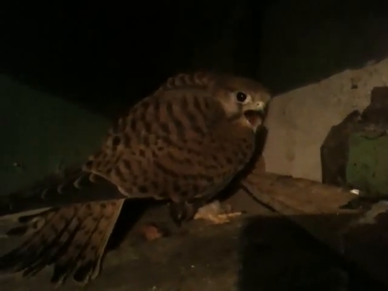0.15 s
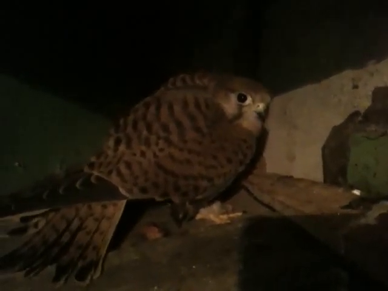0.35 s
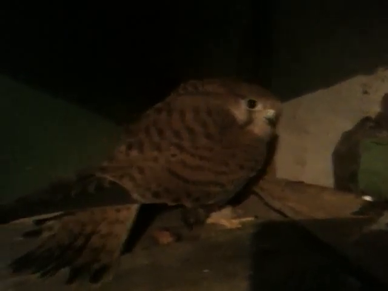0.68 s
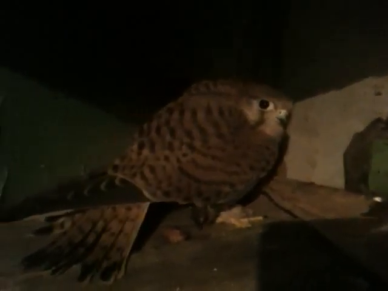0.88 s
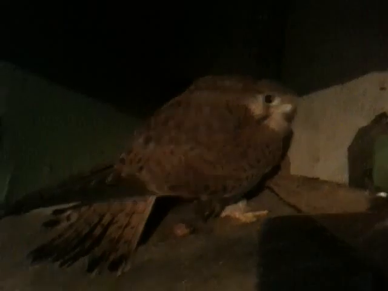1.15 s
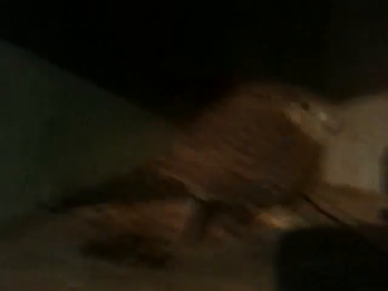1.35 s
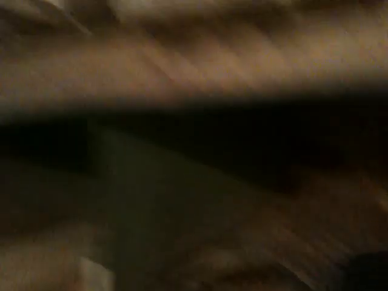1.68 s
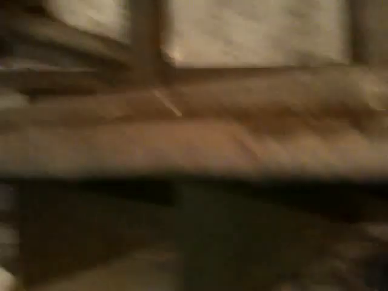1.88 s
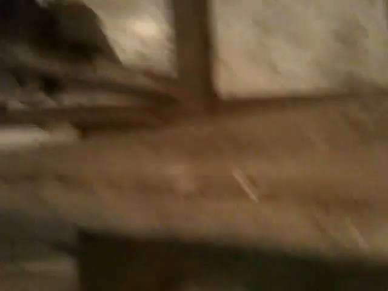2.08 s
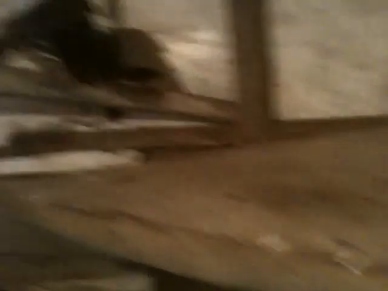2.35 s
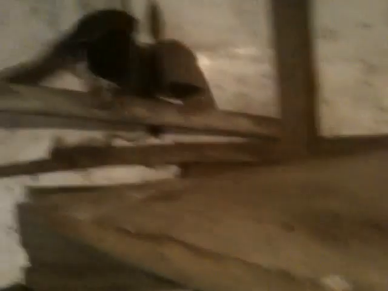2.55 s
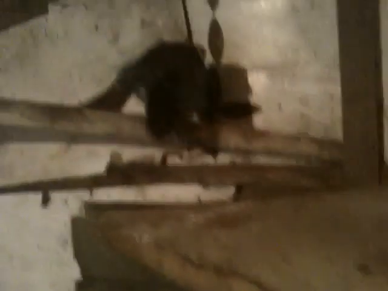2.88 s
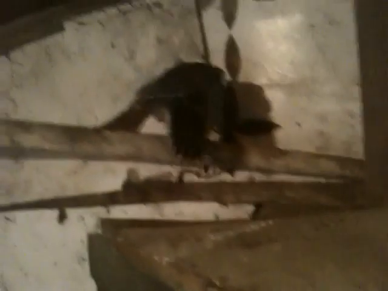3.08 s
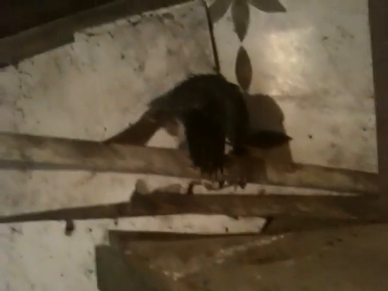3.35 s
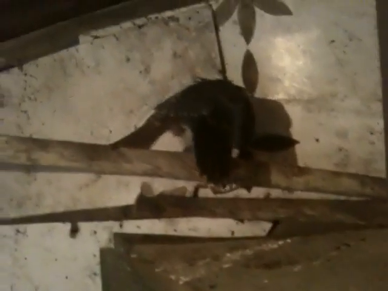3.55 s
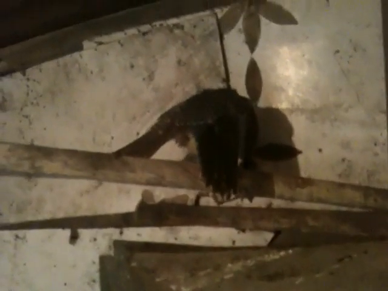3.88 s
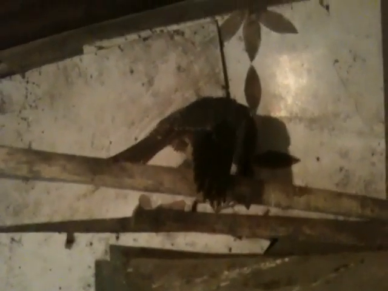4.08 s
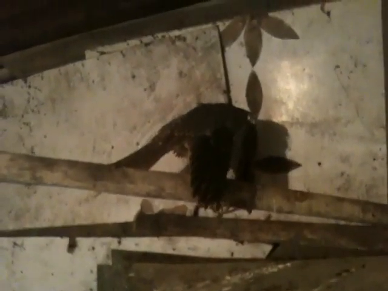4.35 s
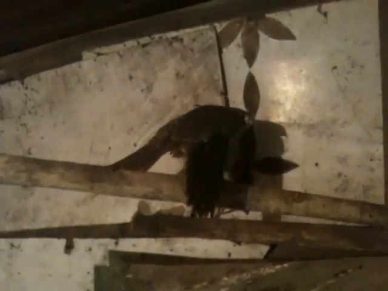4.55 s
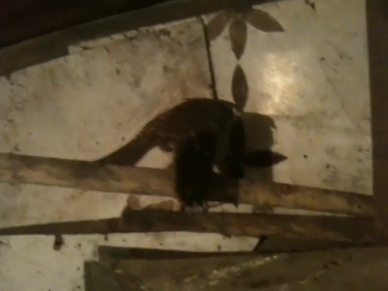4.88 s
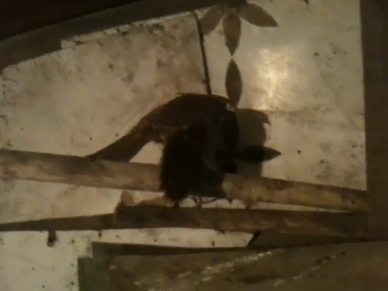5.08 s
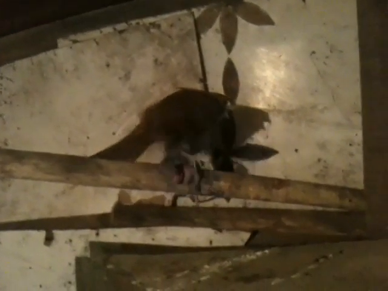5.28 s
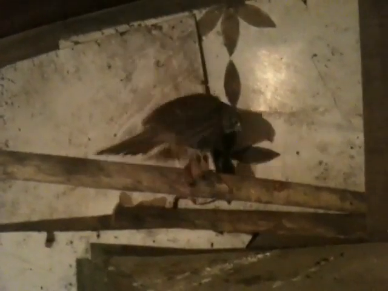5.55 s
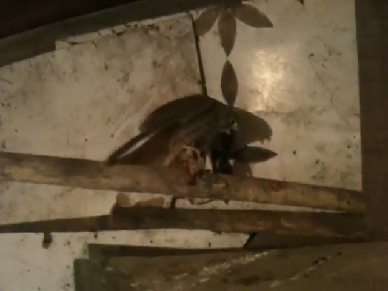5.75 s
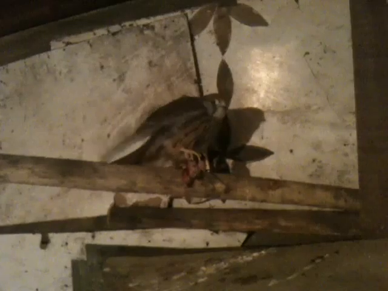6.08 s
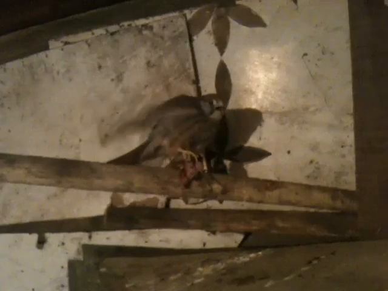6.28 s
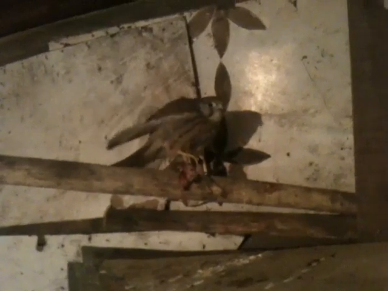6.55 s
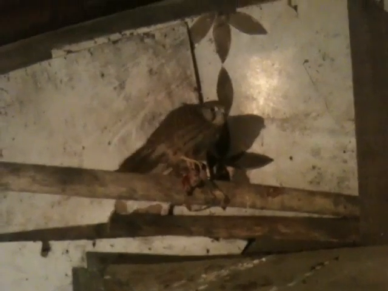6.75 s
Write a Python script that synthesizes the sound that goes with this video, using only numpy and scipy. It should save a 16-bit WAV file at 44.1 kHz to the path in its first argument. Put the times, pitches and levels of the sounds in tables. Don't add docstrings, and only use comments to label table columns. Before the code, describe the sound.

Piercing, fast-trembling kestrel screams, first crowded and overlapping, then spaced apart, ring off boards in a small attic with background hiss.

```python
import sys
import numpy as np
from scipy import signal
from scipy.io import wavfile
from scipy.ndimage import uniform_filter1d, minimum_filter1d

SR = 44100
rng = np.random.default_rng(int(sys.argv[2]) if len(sys.argv) > 2 else 0)


def field_ratio(decibels):
    return 10 ** (np.asarray(decibels, dtype=float) / 20)


def persist_wave(psi):
    counts = np.round(np.clip(psi, -1, 1) * 32767).astype(np.int16)
    wavfile.write(sys.argv[1], SR, np.atleast_2d(counts).T)


N = 304819

# (start [s], opening crest [s], first trill crest [s], last trill crest [s], end [s])
SCREAM_TIMES = [(0.0, .012, .064, .266, .308), (.31, .354, .406, .532, .568),
                (.675, .706, .776, 1.043, 1.078), (1.18, 1.204, 1.285, 1.543, 1.58),
                (1.69, 1.712, 1.794, 2.057, 2.092), (1.845, 1.86, 1.955, 2.213, 2.243),
                (2.258, 2.312, 2.377, 2.505, 2.562), (2.49, 2.512, 2.585, 2.845, 2.862),
                (2.678, 2.698, 2.772, 3.031, 3.066), (3.195, 3.207, 3.304, 3.495, 3.542),
                (3.39, 3.412, 3.485, 3.62, 3.685), (3.66, 3.692, 3.759, 3.953, 3.995),
                (4.115, 4.166, 4.229, 4.413, 4.45), (4.622, 4.637, 4.714, 4.898, 4.94),
                (5.07, 5.108, 5.166, 5.426, 5.456), (5.705, 5.753, 5.817, 6.058, 6.11),
                (6.26, 6.293, 6.358, 6.552, 6.602)]
# (opening [Hz], first [Hz], middle [Hz], last [Hz], trill swing [0-1])
CREST_PITCHES = [(1900, 2150, 2200, 2238, .085), (1714, 1767, 1814, 1871, .1),
                 (1824, 1730, 1835, 1905, .11), (1845, 1760, 1920, 1930, .14),
                 (1883, 1750, 1880, 1950, .11), (1850, 2010, 2170, 2230, .1),
                 (1786, 1923, 1955, 1960, .145), (1966, 2150, 2215, 2225, .085),
                 (1910, 1846, 1975, 2060, .14), (1820, 1896, 1983, 2005, .13),
                 (1964, 2065, 2220, 2300, .07), (1920, 1890, 1930, 1990, .125),
                 (1892, 1930, 1942, 2005, .105), (1934, 1892, 1943, 1967, .12),
                 (1897, 1950, 2035, 2060, .1), (2016, 2025, 2095, 2020, .09),
                 (1892, 1935, 2003, 2052, .105)]
# (opening [dB], first [dB], middle [dB], last [dB], dips [dB])
EFFORT_SWELLS = [(-12, -2.5, -1.5, 1.9, -16), (-25, -22, -21.5, -20, -26.5), (-26.5, -27, -23, -22, -27.5),
                 (-29, -20.5, -16, -17.5, -28), (-24, -21, -13, -11, -22.5),
                 (-18, -16.5, -12.5, -15.5, -17), (-19, -9, -9, -9.5, -23.5),
                 (-15.5, -13, -13, -17.5, -20.5), (-22, -12, -7, -4.5, -20.5),
                 (-26, -11.5, -7, -6.5, -22.5), (-24, -16.5, -19, -17.5, -25), (-20, -10.5, -10, -6, -23),
                 (-14.5, -10, -7, -3.5, -19.5), (-21, -11.5, -10.3, -9, -21.5),
                 (-15, -11.5, -6, -8.5, -21.5), (-15.5, -11.5, -10.5, -10.5, -19.5),
                 (-19.5, -13.5, -10, -6.5, -22)]
# (all partials joined [s], fundamental [dB], tilt [dB per partial], hoarseness [dB], loft send [dB])
VOICE_TIMBRES = [(.0, -2, 2, -24.5, -9.5), (0.0035, 9, 1.5, -32, -2), (0.046, 8, 1.5, -38, -1),
                 (0.028, 3, 1, -40, 0), (0.022, 4.5, 1.5, -40, -5.5), (0.002, 13, 3.5, -26, -5.5),
                 (0, 0.5, 1, -41, -2), (0.014, 13, 3.5, -24.5, -4.5), (0.019, 1.5, 1.5, -38, -9),
                 (0.0016, 5.5, 2.5, -32.5, -2.5), (0, 12.5, 3.5, -22, -1), (0, 1, 1.5, -39.5, -3.5),
                 (0.00075, -1.5, 1, -38.5, -5), (0.02, -1, 1.5, -88, -2.5), (0, 0, 1.5, -40.5, -2.5),
                 (0.019, 4.5, 2.5, -40, -6.5), (0.0036, 1.5, 2, -35, -5.5)]
# (frequency [Hz], gain [dB])
THROAT_RESONANCE = [(1500, -21), (2200, -13), (3200, -5), (3600, -7), (4000, -1.5), (4500, 2.5),
                    (5000, -2.5), (5800, -4.5), (6600, -8.5), (8000, -14), (10000, -14.5), (12000, -24),
                    (14000, -25.5), (17000, -37.5)]
# (frequency [Hz], t60 [s])
LOFT_DECAY = [(1500, 0.22), (4000, 0.22), (7000, 0.15), (12000, 0.13)]
# (frequency [Hz], gain [dB])
LOFT_TINT = [(1500, 4), (4000, 2.5), (7000, 3.5), (12000, 5)]
# (frequency [Hz], density [dB per Hz])
HISS_SPECTRUM = [(40, -64.5), (90, -53), (150, -29), (400, -11), (850, -13.5), (1360, -10), (1700, -31),
                 (2700, -19), (4200, -21.5), (4900, -8), (6800, 1.5), (9000, -14), (11000, -28),
                 (16500, -54.5)]
# (nearest [s], level [dB], passing time [s])
TRAFFIC = [
    (1.05, -57.5, 1),
    (2.6, -71.5, 0.23),
    (5.95, -62.5, 0.73),
]
# (time [s], level [dB], centre [Hz], length [s])
VOICE_CRACKS = [(2.13, -28, 4300, .13), (2.73, -29, 4600, .14), (3.54, -29, 4700, .18),
                (5.07, -33, 4300, .12), (6.27, -33, 4400, .14), (5.88, -34, 4900, .22), (.3, -32, 4400, .1),
                (.72, -38, 4400, .16)]
# (time [s], frequency [Hz], level [dB])
FAR_WHISTLES = [
    [(.6, 1285, -61), (.9, 1250, -65), (1.22, 1265, -59)],
    [(1.78, 1370, -53), (2.0, 1290, -55), (2.18, 1264, -48.5), (2.35, 1120, -58.5), (2.55, 996, -67)],
    [(3.65, 822, -56.5), (3.85, 826, -68)],
    [(4.25, 1198, -70.5), (4.45, 1267, -60), (4.62, 1125, -62)],
    [(5.48, 1280, -64), (5.75, 1370, -58), (6.05, 1250, -65)],
    [(6.4, 1010, -63), (6.52, 1043, -60), (6.62, 1190, -57)],
]
# (time [s], peak [dB])
BEAK_RASPS = [(0.68, -25), (1.182, -25), (1.6855, -23), (3.1928, -22), (4.1165, -20), (4.6032, -19.5),
              (5.0703, -23), (5.709, -27), (6.2556, -24)]
# (time [s], level [dB], centre [Hz], length [s])
FEATHER_BRUSHES = [(4.59, -52, 400, 0.048), (5.6, -55, 1500, 0.039), (6.83, -51, 950, 0.047),
                   (5.49, -57, 150, 0.05), (5.08, -40, 3600, 0.097), (6.27, -36, 7700, 0.18),
                   (1.7, -38.5, 4100, 0.087), (2.0, -31, 5500, 0.25), (6.44, -37, 4500, .04),
                   (2.4, -38, 3600, .09), (5.44, -40.5, 3000, 0.045), (3.98, -41, 2800, 0.046),
                   (4.93, -41, 2800, 0.039)]
# (frequency [Hz], threshold [dB], fuzz [dB], clean part [dB])
MASKING = [(2200, -26, -19.5, -.1), (5100, -19, -10, -.3), (8040, -9, -5, -1.5), (12000, -2, 2, -6),
           (16000, 1, 4, -9)]

TRILL_S, REST_S = .065, .05
QUICKEN, DIP_LEAD_S, CUT_S = .07, .036, 0.004
SWING_EARLY, SWING_NARROWS, DIPS_RISE_DB = 1.1, 0.32, 4
RESTED_PITCH, RESTED_DB, HURRIED_PITCH, HURRIED_DB = .9, -14, 1.02, -0.5
END_PITCH, END_DB, CUT_PITCH, CUT_DB = .92, 0, 0.89, -55.5
THIRD_SHARE, THIRD_DB = 0.34, -1.2
RASP_HZ, RASP_T60 = 3560, 0.045
HISS_DB = -45.5
EDGE_HZ = 17400


def evened(x):
    return x / np.sqrt(np.mean(x ** 2) + 1e-20)


def read(points, hz):
    f, value = np.transpose(points)
    return np.interp(np.log(hz + 1), np.log(f + 1), value)


def add(mix, s, sound):
    part = mix[round(s * SR):][:len(sound)]
    part += sound[:len(part)]


def wobble(size, ms):
    span = max(round(ms * SR / 1000), 2)
    once = uniform_filter1d(rng.standard_normal(size), span)
    return evened(uniform_filter1d(once, span))


def puff(hz, t, width=0.69):
    edges = np.clip([hz / (1 + width), hz * (1 + width) ** 2], 20, SR / 2.2)
    band = signal.butter(2, edges, "band", fs=SR, output="sos")
    return evened(signal.sosfilt(band, rng.standard_normal(len(t))))


def arch(u, first, middle, last):
    line = first + (last - first) * u
    return line + 4 * u * (1 - u) * (middle - (first + last) / 2)


def plan(times, pitches, swells, rested):
    start, opening, first, last, end = times
    u = np.linspace(0, 1, round((last - first) / TRILL_S) + 1)
    crest_s = first + (last - first) * (u + QUICKEN * u * (1 - u))
    crest_hz = arch(u, *pitches[1:4])
    dip_hz = crest_hz * (1 - pitches[4] * (SWING_EARLY - SWING_NARROWS * u ** 2))
    start_hz = pitches[0] * (RESTED_PITCH if rested else HURRIED_PITCH)
    start_db = swells[0] + (RESTED_DB if rested else HURRIED_DB)
    end_hz = END_PITCH * pitches[3]
    trills = [(start, start_hz, opening, pitches[0]),
              *zip(crest_s - DIP_LEAD_S, dip_hz, crest_s, crest_hz),
              (end, end_hz, end + CUT_S, CUT_PITCH * end_hz)]
    efforts = [(start_db, swells[0]),
               *zip(swells[4] + DIPS_RISE_DB * (u - .5), arch(u, *swells[1:4])),
               (swells[4] + END_DB, CUT_DB)]
    return trills, efforts


def scream(trills, efforts, voice, flat_top=1.3, lead_s=0.0087, hold_s=.014, snap=0.47,
           pitch_snap=.35, ring_db=6, jitter=0.003):
    join_s, low_db, tilt_db, hoarse_db, _ = voice
    third_db = THIRD_DB + THIRD_SHARE * low_db
    (s, knot_hz), knot_db = np.reshape(trills, (-1, 2)).T, np.ravel(efforts)
    t = np.arange(s[0], s[-1], 1 / SR)
    since = t - s[0]
    place = np.interp(t, np.maximum.accumulate(s), np.arange(len(s)))
    height = 1 - (.5 + .5 * np.cos(np.pi * place)) ** flat_top
    late = t[:, None] - s[1:-1:2]
    inside = np.minimum(late + lead_s, hold_s - late).max(1)
    crest = np.clip(inside / 0.00447 + .5, 0, 1)

    def between(knots, share):
        up = np.where(t > s[-2], height, (1 - share) * height + share * crest)
        step = np.floor(place)
        return np.interp(step + np.where(step % 2, 1 - up, up), np.arange(len(s)), knots)

    hz, effort_db = between(knot_hz, pitch_snap), between(knot_db, snap)
    closing = np.exp(-np.maximum(s[-2] - t, 0) / 0.00648)
    hz = hz * (1 - 0.0953 * closing)
    unsettled = 1.1 * closing + np.exp(-since / 0.0412)
    hz = hz * (1 - .09 * (s[0] > 0) * np.exp(-since / .009))
    unsteady = jitter * wobble(len(t), 4.01) + 0.0205 * unsettled * wobble(len(t), 0.66)
    turns = np.cumsum(hz * (1 + unsteady)) / SR

    k = np.arange(1, 10)[:, None]
    colour_db = (tilt_db - 1.5 * closing) * (k - 2) + low_db * (k == 1) + third_db * (k == 3)
    crest_db = (ring_db - 0.27 * low_db) * (k == 2) + 2.76 * (k == 3)
    weight = field_ratio(read(THROAT_RESONANCE, k * hz) + colour_db + crest * crest_db)
    joining = np.clip((since - join_s) / .014, .03, 1)
    weight = weight * np.where(k != 2, joining, 1) * (k * hz < SR / 2.3)
    weight = weight / np.sqrt((weight ** 2).sum(0) / 2)

    flutter_db = (1.5 + 0.43 * abs(k - 2)) * (1.59 - 1.02 * crest)
    flutter = field_ratio(flutter_db * np.array([wobble(len(t), 5.2) for _ in k]))
    hoarse = field_ratio(hoarse_db + 5 + 12 * unsettled - 10 * (k == 1))
    hoarse = hoarse * np.array([wobble(len(t), .4) for _ in k])
    grain = field_ratio(-20.5 + 1.6 * k) * (k != 2) * np.array([wobble(len(t), 2.3) for _ in k])
    partials = np.cos(2 * np.pi * (k * turns + rng.random(k.shape)))
    stack = (weight * (flutter + hoarse + grain) * partials).sum(0)
    halves = sum(np.cos(2 * np.pi * (m + .5) * turns) / m for m in range(1, 4))
    halves = field_ratio(hoarse_db + 2.5 * wobble(len(t), 36)) * halves
    return field_ratio(effort_db) * (stack + halves) * signal.windows.tukey(len(t), .02)


def beams(x, t60=0.02, db=-11):
    t = np.arange(round(.03 * SR)) / SR
    struck = rng.random(len(t)) < 900 / SR
    taps = rng.choice([-1., 1.], len(t)) * struck * (t > .0008) * field_ratio(-60 * t / t60)
    return x + field_ratio(db) * signal.fftconvolve(x, taps / np.linalg.norm(taps))[:N]


def loft(x, first_s=.004):
    out, phase = np.zeros(N), np.arange(N) / SR * 9.0
    for k in range(3):
        taps = np.zeros(SR // 2)
        at = np.arange(round(first_s * SR), len(taps) - 20, 20)
        taps[at + rng.integers(0, 20, len(at))] = rng.choice([-1., 1.], len(at))
        hz, t, z = signal.stft(taps, SR, nperseg=128)
        decay_db = read(LOFT_TINT, hz)[:, None] - 60 * t / read(LOFT_DECAY, hz)[:, None]
        tail = signal.istft(z * field_ratio(decay_db), SR, nperseg=128)[1]
        window = np.sqrt(2 / 3) * abs(np.cos(np.pi * (phase / 3 + k / 3)))
        out += signal.fftconvolve(x * window, tail / np.linalg.norm(tail))[:N] / 1.04
    return out


def hiss():
    frames, hz = N // 256 + 5, np.fft.rfftfreq(1024, 1 / SR)
    a, b, patches = rng.standard_normal((frames, 513, 3)).T
    patches = evened(uniform_filter1d(uniform_filter1d(patches, 10, 0), 12, 1))
    z = (a + 1j * b) * field_ratio(read(HISS_SPECTRUM, hz)[:, None] + 1.6 * patches)
    return field_ratio(HISS_DB) * evened(signal.istft(z, nperseg=1024, noverlap=768)[1][:N])


def hum():
    t = np.arange(N) / SR
    level = sum(field_ratio(db) / (1 + ((t - s) / passing) ** 2) for s, db, passing in TRAFFIC)
    band = signal.butter(3, [120, 300], "band", fs=SR, output="sos")
    return field_ratio(-8.5) * level * evened(signal.sosfilt(band, rng.standard_normal(N)))


def cracks():
    out, t = np.zeros(N), np.arange(SR // 2) / SR
    for s, db, hz, length in VOICE_CRACKS:
        grain = puff(hz, t, .25) * field_ratio(5 * wobble(len(t), 2.5) - 3)
        add(out, s, field_ratio(db) * grain * np.sin(np.pi * np.minimum(t / length, 1)))
    return out


def whistles():
    out = np.zeros(N)
    for rows in FAR_WHISTLES:
        s, hz, db = np.transpose(rows)
        t = np.arange(s[0], s[-1], 1 / SR)
        turns = np.cumsum(np.interp(t, s, hz) * (1 + 0.004 * wobble(len(t), 12.7))) / SR
        tone = np.sqrt(2) * np.sin(2 * np.pi * turns) * field_ratio(4.5 * wobble(len(t), 20) - 2)
        add(out, s[0], field_ratio(np.interp(t, s, db)) * tone * signal.windows.tukey(len(t), .2))
    return out


def rasps():
    out, t = np.zeros(N), np.arange(SR // 2) / SR
    for s, db in BEAK_RASPS:
        decay = field_ratio(db - 2.5 - 60 * t / RASP_T60)
        add(out, s, decay * puff(RASP_HZ, t, .2) * np.minimum(t / .005, 1))
    return out


def brushes():
    out, t = np.zeros(N), np.arange(SR // 2) / SR
    for s, db, hz, length in FEATHER_BRUSHES:
        add(out, s, field_ratio(db) * puff(hz, t) * np.sin(np.pi * np.minimum(t / length, 1)) ** 2)
    return out


def scene():
    direct, wet, quiet_since = np.zeros(N), np.zeros(N), 0
    for times, pitches, swells, voice in zip(SCREAM_TIMES, CREST_PITCHES, EFFORT_SWELLS, VOICE_TIMBRES):
        rested = times[0] - quiet_since > REST_S
        sound = scream(*plan(times, pitches, swells, rested), voice)
        add(direct, times[0], sound)
        add(wet, times[0], field_ratio(voice[-1]) * sound)
        quiet_since = times[-1]
    small = cracks() + whistles() + rasps() + brushes()
    return (beams(direct + small) + loft(wet + 0.68 * small) + hiss() + hum())[None]


def masked(x, chance_db=4.5, low_hz=2200):
    hz, _, z = signal.stft(x, SR, nperseg=2048)
    starts, band = np.arange(0, len(hz), 12), np.arange(len(hz)) // 12
    knee_hz, drop_db, fuzz_db, clean_db = np.transpose(MASKING)
    power = np.add.reduceat(abs(z) ** 2, starts, axis=1) / 12
    limit_db = np.interp(hz[starts], knee_hz, drop_db)[:, None]
    limit_db = limit_db + chance_db * rng.standard_normal(power.shape)
    hidden = power < uniform_filter1d(power, size=15, axis=1) * field_ratio(limit_db) ** 2
    fuzz = np.exp(2j * np.pi * rng.random(z.shape))
    fuzz = fuzz * np.sqrt(minimum_filter1d(power, size=2, axis=2)[:, band])
    fuzz = fuzz * ((hz < EDGE_HZ - 400) * field_ratio(np.interp(hz, knee_hz, fuzz_db)))[:, None]
    high = (hz > low_hz)[:, None]
    clean = z * field_ratio(np.interp(hz, knee_hz, clean_db))[:, None]
    kept = (clean + fuzz * high) * ~(hidden[:, band] & high)
    return signal.istft(kept, SR, nperseg=2048)[1][:, :N]


def band_limit(x):
    return signal.sosfilt(signal.butter(12, 17080, fs=SR, output="sos"), x)


def record(dry):
    clipped = np.clip(dry, -.93, .93)
    lean = signal.lfilter(*signal.butter(1, 45, "high", fs=SR), clipped)
    low_pass = signal.firwin(255, EDGE_HZ, fs=SR, window=("kaiser", 8))
    limited = signal.oaconvolve(lean, low_pass[None], "same")
    return band_limit(masked(limited))


dry = scene()
out = record(dry)
persist_wave(out)
```